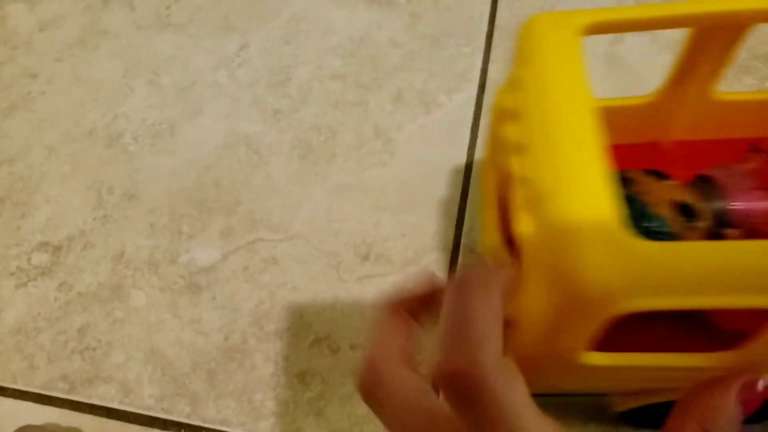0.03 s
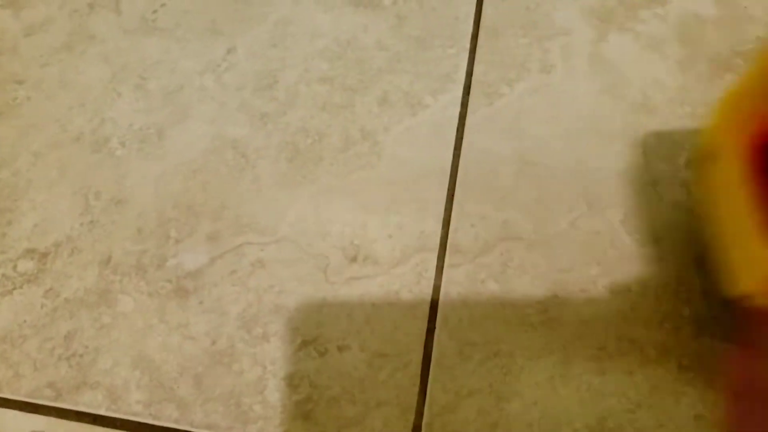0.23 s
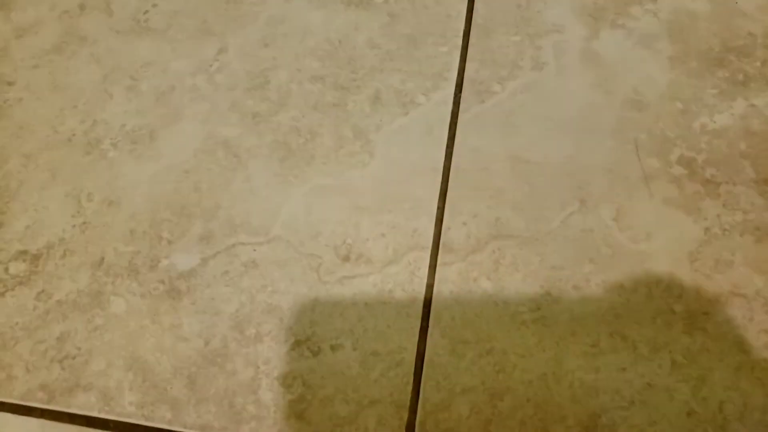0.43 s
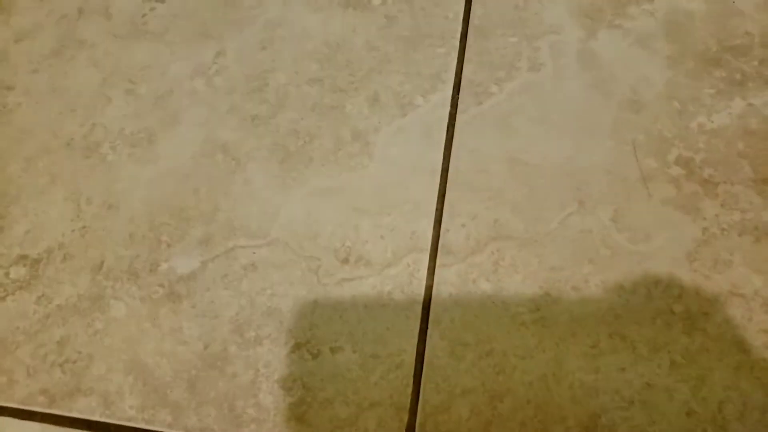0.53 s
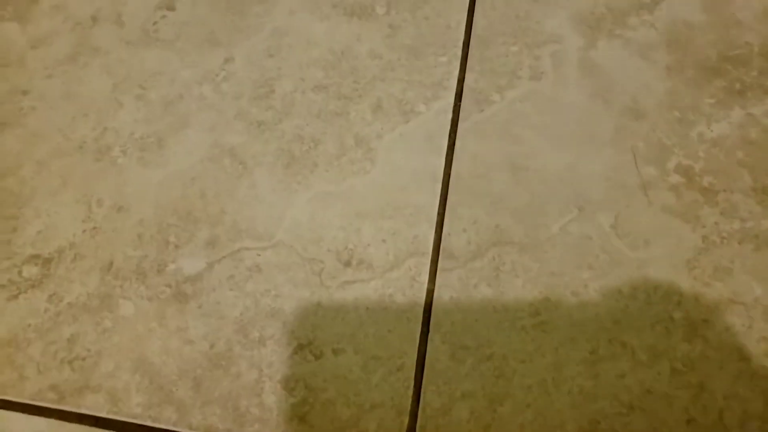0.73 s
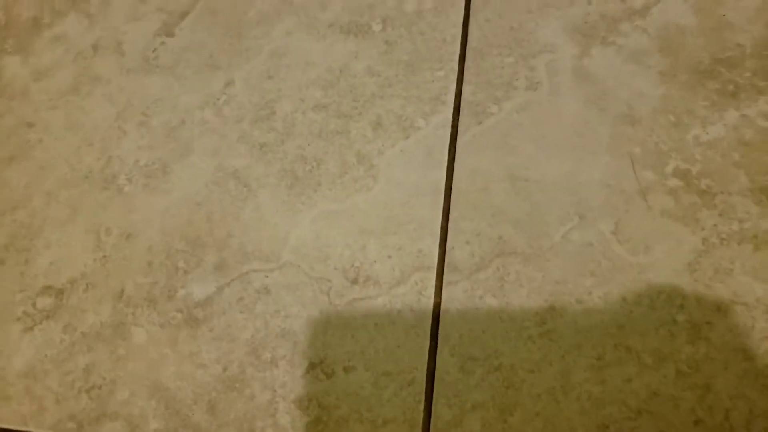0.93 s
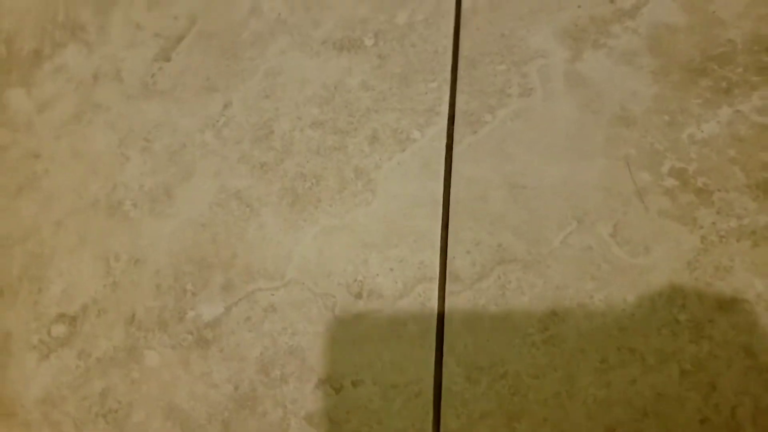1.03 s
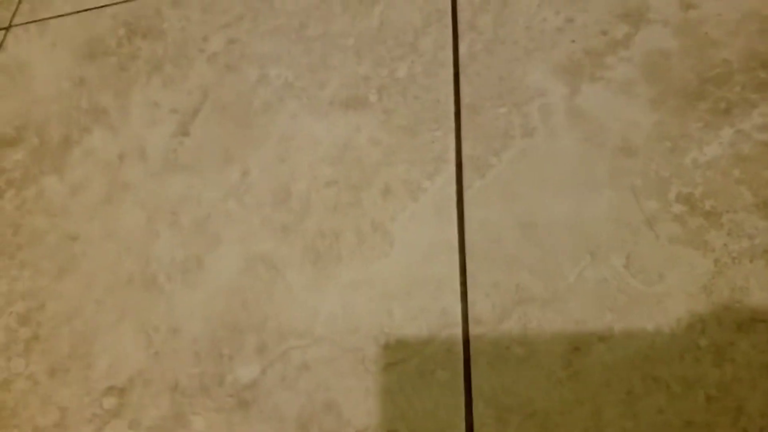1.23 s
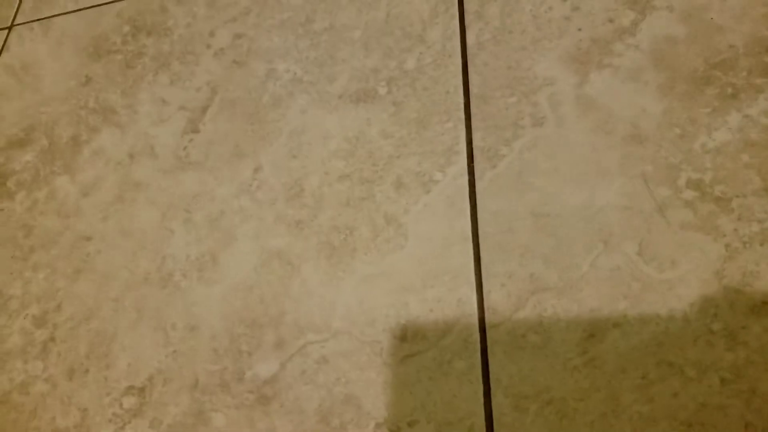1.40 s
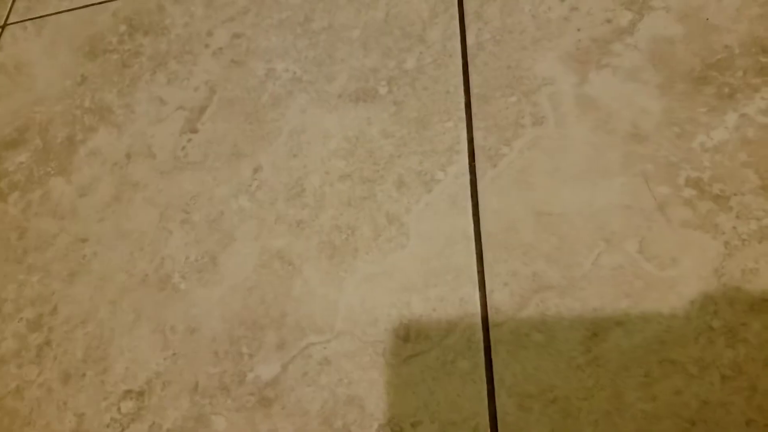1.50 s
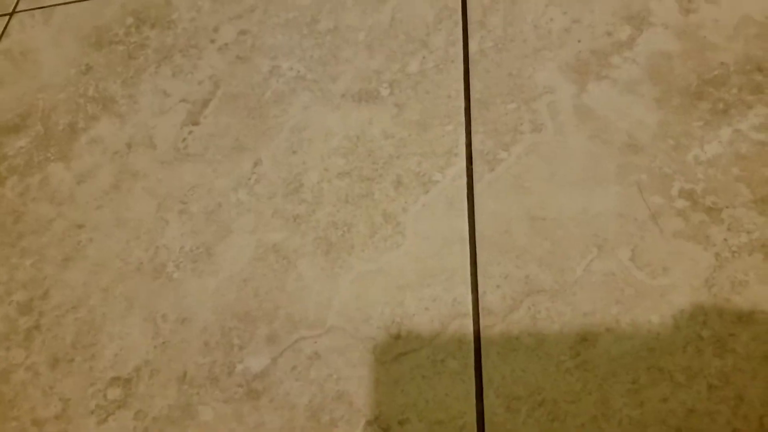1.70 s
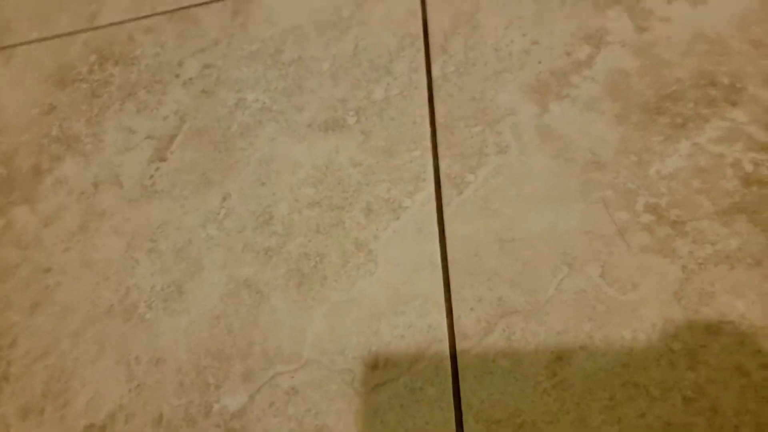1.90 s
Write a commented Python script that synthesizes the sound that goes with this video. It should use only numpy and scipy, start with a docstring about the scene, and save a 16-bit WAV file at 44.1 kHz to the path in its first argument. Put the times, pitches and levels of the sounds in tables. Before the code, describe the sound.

Plastic toy bus rattling over a tiled floor, followed by close rustling and two bumps.

```python
"""A hard, echoing room with a tiled floor. A hollow plastic toy bus is pushed off to the right:
its wheels rumble, its shell knocks over the joints, loose parts tick, and it scrapes as it skids.
Then cloth rustles close to the microphone and two handling bumps hit the right port.
Underneath: air noise, low mains hum and the deep rumble of a hand on the housing."""
import sys
import numpy as np
from scipy import signal
from scipy.fft import rfft, irfft
from scipy.io import wavfile

SR = 44100
rng = np.random.default_rng(int(sys.argv[2]) if len(sys.argv) > 2 else 0)


def store_pcm(level_fs):
    """Save levels as 16-bit WAV."""
    pcm = np.round(np.clip(level_fs, -1, 1) * 32767).astype(np.int16)
    wavfile.write(sys.argv[1], SR, np.atleast_2d(pcm).T)


N = 85995
TIME_S = np.arange(N) / SR
BIN_OCT = np.log2(np.maximum(np.fft.rfftfreq(N, 1 / SR), 1))
TOP_HZ = 14800


def undb(db):
    """Decibels to gain."""
    return 10 ** (np.asarray(db) / 20)


def unit(x):
    """Scale to rms 1."""
    return x / np.sqrt(np.mean(x ** 2))


def fade(t60_s):
    """Exponential decay."""
    return np.exp(-np.minimum(np.log(1000) * TIME_S / t60_s, 60))


def curve(rows, column=1):
    """Table column, linearly interpolated over time."""
    rows = np.array(rows)
    return np.interp(TIME_S, rows[:, 0], rows[:, column])


def colour(x, points):
    """Minimum-phase filter through (freq_hz, gain_db) points."""
    hz, db = np.array(points).T
    cepstrum = irfft(np.log(undb(np.interp(BIN_OCT, np.log2(hz), db))), N)
    cepstrum[1:N // 2] *= 2
    cepstrum[N // 2:] = 0
    return irfft(rfft(x) * np.exp(rfft(cepstrum)), N)


def band(x, centre_hz, half_width_oct):
    """Bell-shaped band of x at rms 1."""
    return unit(irfft(rfft(x) / (1 + ((BIN_OCT - np.log2(centre_hz)) / half_width_oct) ** 2), N))


def delay(x, lag_s):
    """Shift later, same length."""
    samples = int(np.clip(lag_s * SR, 0, N - 1))
    return np.concatenate([np.zeros(samples), x[:N - samples]])


def pan(left_minus_right_db):
    """Stereo gain pair."""
    return undb(np.array([[1], [-1]]) * left_minus_right_db / 2)


def ring(pitch_hz, t60_s):
    """One struck mode."""
    return np.sin(2 * np.pi * pitch_hz * TIME_S) * fade(t60_s)


def grains(rate_per_s, scatter_db):
    """Random tiny impacts, a few much stronger than the rest."""
    impulses = (rng.random(N) < rate_per_s / SR) * rng.choice([-1, 1], N)
    return impulses * undb(scatter_db * np.minimum(rng.exponential(size=N), 6))


def clicks(rows, t60_s, half_width_oct):
    """Short noise bursts, each in its own band."""
    out = 0
    for start_s, level_db, centre_hz in rows:
        burst = band(rng.standard_normal(N), centre_hz, half_width_oct)
        out += delay(burst * fade(t60_s) * undb(level_db) / 2, start_s)
    return out


def room_tone():
    """Steady air noise, alike at both ports in the bass, and mains hum."""
    air_colour = [(12, -53), (28, -17), (42, -10), (60, -7), (90, -5), (160, -5.5), (260, -2.5),
                  (400, -5.5), (700, -5), (1100, -14), (2200, -18.5), (3200, -34), (6000, -37.5),
                  (9000, -46.5), (15000, -49)]  # freq_hz, gain_db
    hum_lines = [(60, -63), (120, -71.5), (240, -61)]  # pitch_hz, level_db
    air_db, wide_above_hz = -53, 650
    mid, side = rng.standard_normal((2, N))
    side = irfft(rfft(side) * np.minimum(np.sqrt(2 ** BIN_OCT / wide_above_hz), 1), N)
    air = unit(colour(np.array([mid + side, mid - side]), air_colour)) * undb(air_db)
    hum = sum(undb(level_db) * np.sqrt(2) * np.sin(2 * np.pi * (pitch_hz * TIME_S + rng.random()))
              for pitch_hz, level_db in hum_lines)
    return air * pan(1) + hum * pan(0.5)


def grip():
    """A hand shifts on the housing: deep rumble, soft thumps."""
    rumble_levels = [(0, -54.5), (.16, -58), (.28, -57), (.35, -56.5), (.6, -52.5), (.68, -70), (.9, -63),
                     (1.15, -65), (1.4, -60), (1.7, -58), (1.95, -69)]  # time_s, level_db
    rumble_colour = [(15, -7), (30, -34), (48, 1.5), (75, 3.5), (110, -7), (200, -10.5), (500, -26.5),
                     (2000, -67)]  # freq_hz, gain_db
    thump_events = [(0.334, -41, 63), (0.563, -54, 67), (1.195, -40, 68), (1.498, -32, 59.5),
                    (1.626, -35, 58.7), (1.822, -40, 58)]  # start_s, level_db, pitch_hz
    rumble = unit(colour(rng.standard_normal(N), rumble_colour)) * undb(curve(rumble_levels))
    thumps = 0
    for start_s, level_db, pitch_hz in thump_events:
        attack = 1 - fade(2 / pitch_hz)
        thumps += delay(undb(level_db) * ring(pitch_hz, t60_s=0.066) * attack, start_s)
    return rumble + thumps * pan(-11)


def wheels():
    """Wheels roll on tile: a gritty rumble of tiny impacts."""
    roll_levels = [(0, -67.5), (.2, -64), (.29, -46), (.45, -48), (.65, -47.5), (.85, -45), (1.0, -48.5),
                   (1.15, -56), (1.95, -88)]  # time_s, level_db
    roll_colour = [(100, -28), (300, -13.5), (520, 1), (680, 7.5), (830, -4.5), (1100, -9), (2200, -13),
                   (3200, -38.5), (7000, -36), (15000, -65)]  # freq_hz, gain_db
    grit = grains(rate_per_s=1600, scatter_db=2)
    return unit(colour(grit, roll_colour)) * undb(curve(roll_levels))


def knocks():
    """Each knock cracks and rings the shell in its own mix of modes; soft contact dulls both."""
    hits = [(.075, -49, -68, -14, 1280), (.126, -41, -65, -23, 1300), (0.2141, -27, -38, 3, 1610),
            (.2285, -34, -37, 5, 1700), (.2365, -35, -53, 16, 1490), (.2692, -30, -61, -13, 1800),
            (.3128, -14.5, -37, -4, 5000), (.3156, -27, -46, 2.5, 3000), (.3185, -28.5, -35.5, 1, 4000),
            (.3285, -25, -30, -5, 6000), (.3422, -28, -37, -27, 6000), (.3478, -33, -36.5, -14, 7100),
            (.3752, -26, -41, 0, 5000), (.4015, -39, -41, 2, 6040), (.432, -33, -42, -9, 4000),
            (.440, -28, -38, 0, 7000), (.451, -29.5, -44, -3, 4950), (.5085, -21.5, -36, 1, 12000),
            (.5175, -27, -28, 20, 12300), (.5198, -22.5, -26, 17.5, 6500), (.5385, -21, -27, 2, 5030),
            (.544, -29.5, -32, 15, 9000), (.565, -43, -32, 2, 8000), (.592, -33, -35.5, 2, 8000),
            (.7045, -26, -26, 6, 12500), (.7078, -20.5, -28, 7, 4970), (.7105, -14.5, -24.5, 4, 3960),
            (.7155, -17, -20.5, 16.5, 7200), (.733, -26, -47, -3, 5000), (.757, -50, -38.5, -7, 5000),
            (.785, -24, -39, 4, 5000), (.817, -27, -37, 0, 4000), (.836, -30.5, -32.5, 4, 4000)]  # start_s, ring_db, crack_db, tilt_db_per_oct, cutoff_hz
    shell_modes = [(396, -14.5, 0.032), (570, -36, .03), (692, 1.5, 0.043), (772, 8, 0.034),
                   (846, 4, 0.038), (930, -16, .02), (1276, -13, 0.056), (1420, -25, 0.014),
                   (1940, -30, 0.02), (2290, -23.5, 0.024)]  # pitch_hz, level_db, t60_s
    crack_colour = [(300, -5), (900, -3.5), (1500, -0.5), (2500, -2.5), (3300, -4), (4500, -11),
                    (6500, -18.5), (9000, -21.5), (12000, -16.5), (15000, -16)]  # freq_hz, gain_db
    scatter_db, pivot_hz, radiates_above_hz = 2, 733, 326
    modes = np.array([undb(db) * ring(hz, t60_s) for hz, db, t60_s in shell_modes])
    modes /= np.abs(modes.sum(0)).max()
    mode_oct = np.log2(np.array(shell_modes)[:, 0] / pivot_hz)
    crack_noise = 2 * colour(rng.standard_normal(N), crack_colour)
    out = 0
    for start_s, ring_db, crack_db, tilt_db_per_oct, cutoff_hz in hits:
        mix = undb(ring_db + tilt_db_per_oct * mode_oct + scatter_db * rng.standard_normal(len(modes)))
        crack = undb(crack_db) * crack_noise * delay(fade(t60_s=0.018), start_s)
        contact = signal.butter(4, min(cutoff_hz, TOP_HZ), fs=SR, output="sos")
        out += signal.sosfilt(contact, delay(mix @ modes, start_s) + crack)
    # a small shell radiates little bass
    radiation = signal.butter(4, radiates_above_hz, "high", fs=SR, output="sos")
    return signal.sosfilt(radiation, out)


def loose_parts():
    """Loose plastic parts tick sharply."""
    ticks = [(.2245, -48, 6200), (.2272, -39.5, 5810), (.2985, -33, 5900), (.3345, -34.5, 11000),
             (.5075, -41, 11300), (.515, -50, 10100), (.7042, -46, 9300)]  # start_s, level_db, centre_hz
    return clicks(ticks, t60_s=0.0061, half_width_oct=0.28)


def scrapes():
    """The toy skids after big knocks: dense, dying runs of tiny catches, each around one pitch."""
    skids = [(.322, -45.5, 1930, .25), (.512, -37, 1560, .16), (.720, -39.5, 1330, 0.21)]  # start_s, level_db, centre_hz, t60_s
    catches = grains(rate_per_s=3000, scatter_db=2)
    return sum(band(catches, centre_hz, half_width_oct=0.15) * undb(level_db) * delay(fade(t60_s), start_s)
               for start_s, level_db, centre_hz, t60_s in skids)


def room_echo(x):
    """Diffuse echo off tile and walls, different at each port."""
    echo_bands = [(120, 1.2, -3), (354, 0.83, -9), (770, 0.9, -3.5), (1320, 1.06, 0.5), (2700, 1.01, -0.5),
                  (4760, 1.11, 2), (8900, 0.68, 5.5), (13900, 0.4, 6)]  # centre_hz, t60_s, gain_db
    build_s = 0.0029
    centres_oct = np.log2(np.array(echo_bands)[:, 0])
    spectrum = rfft(rng.standard_normal((2, N)))
    tail = 0
    for share, (_, t60_s, gain_db) in zip(np.eye(len(echo_bands)), echo_bands):
        noise = irfft(spectrum * np.interp(BIN_OCT, centres_oct, share), N)
        envelope = fade(t60_s) * (1 - np.exp(-TIME_S / build_s))
        tail += noise * envelope * undb(gain_db) / np.linalg.norm(envelope)
    return signal.fftconvolve(tail, x[None], axes=1)[:, :N]


def toy_bus():
    """The toy reaches the right port first; its direct sound falls with distance, leaving the echo."""
    start_m, stop_m, unity_gain_m, speed_m_s = 0.45, 1.2, 0.94, 1.0
    left_lag_s = 0.00046
    source = wheels() + knocks() + scrapes() + loose_parts()
    distance_m = np.minimum(start_m + speed_m_s * TIME_S, stop_m)
    direct = source * unity_gain_m / distance_m
    return np.array([delay(direct, left_lag_s), direct]) * pan(-4) + room_echo(source) * pan(-0.5)


def cloth():
    """Fibres catch and slip, brighter as the rub speeds up, with a few snaps."""
    stroke = [(0, -82, 5.5), (1.19, -58, -4), (1.215, -46.5, -1), (1.245, -40, -2), (1.30, -38, 1),
              (1.36, -38.5, 1), (1.44, -42, 1), (1.53, -47, 1), (1.63, -51, 1), (1.72, -55, -0.3),
              (1.785, -54, -3), (1.81, -51, 0), (1.89, -51, -1), (1.95, -51, 0)]  # time_s, level_db, tilt_db_per_oct
    fibre_colour = [(80, -6.5), (300, -1), (800, 3), (1300, -2), (2600, -3), (4500, -9), (6500, -8),
                    (7800, -17.5), (10500, -12.5), (13800, -14), (15500, -41)]  # freq_hz, gain_db
    snap_events = [(1.1925, -44, 11100), (1.204, -33, 3940), (1.2425, -33, 2970), (1.2745, -24.5, 12300),
                   (1.2875, -30, 9100), (1.347, -29.5, 10200), (1.447, -28.5, 12000), (1.467, -35, 12000),
                   (1.59, -36.5, 2500), (1.641, -38.5, 2900), (1.792, -30, 6360), (1.8083, -42.5, 11000),
                   (1.877, -41, 10000)]  # start_s, level_db, centre_hz
    catches = np.array([grains(rate_per_s=9000, scatter_db=3) for _ in range(2)])
    spectrum = rfft(unit(colour(catches, fibre_colour)))
    tilt_db_per_oct = curve(stroke, column=2)
    centres_oct = np.log2([375, 750, 1500, 3000, 6000, 12000])
    rub = 0
    for centre_oct, share in zip(centres_oct, np.eye(len(centres_oct))):
        fibres = irfft(spectrum * np.interp(BIN_OCT, centres_oct, share), N)
        rub += fibres * undb(tilt_db_per_oct * (centre_oct - centres_oct.mean()))
    snaps = np.array([clicks(snap_events, t60_s=0.0062, half_width_oct=0.38) for _ in range(2)])
    return rub * undb(curve(stroke)) * pan(-1.5) + snaps * pan(-7)


def bumps():
    """Dry taps through the housing at the right port: quick push, low thud, click."""
    # start_s, push_db, push_hz, thud_db, thud_hz, click_db, click_hz, click_t60_s
    taps = [(1.492, -3.5, 640, -24.5, 113, -3.5, 2280, 0.0011),
            (1.7497, -17, 427, -29.5, 150, -7, 3680, 0.0012)]
    housing_colour = [(20, -14), (70, 2.5), (400, 0), (750, 4), (1900, -2), (2500, 0.5), (4500, -1.5),
                      (6000, -7), (8000, -21), (15000, -2)]  # freq_hz, gain_db
    push_cycles, thud_cycles, left_db = 1.32, 4.1, -30
    right = 0
    for start_s, push_db, push_hz, thud_db, thud_hz, click_db, click_hz, click_t60_s in taps:
        push = undb(push_db) * ring(push_hz, push_cycles / push_hz)
        thud = undb(thud_db) * ring(thud_hz, thud_cycles / thud_hz)
        click = undb(click_db) * ring(click_hz, click_t60_s)
        right += delay(push - thud + click, start_s)
    return colour(np.array([undb(left_db) * right, right]), housing_colour)


def scene():
    """All sources at the two ports."""
    return toy_bus() + cloth() + bumps() + grip() + room_tone()


def record(dry):
    """Steep low-pass at TOP_HZ."""
    return signal.sosfilt(signal.ellip(10, .2, 70, TOP_HZ, fs=SR, output="sos"), dry)


dry = scene()
out = record(dry)
store_pcm(out)
```